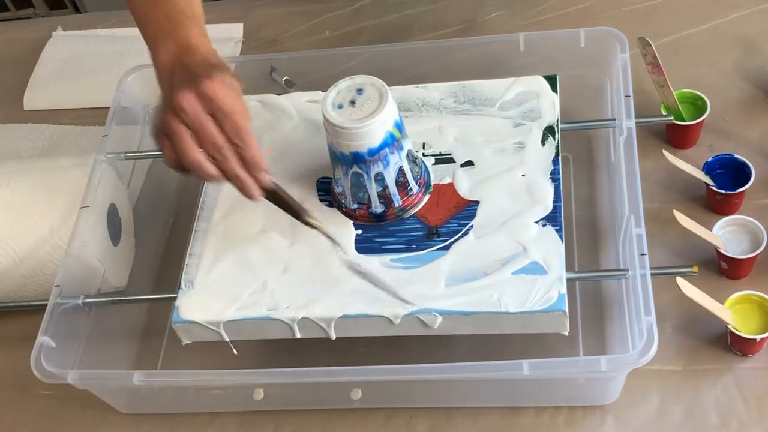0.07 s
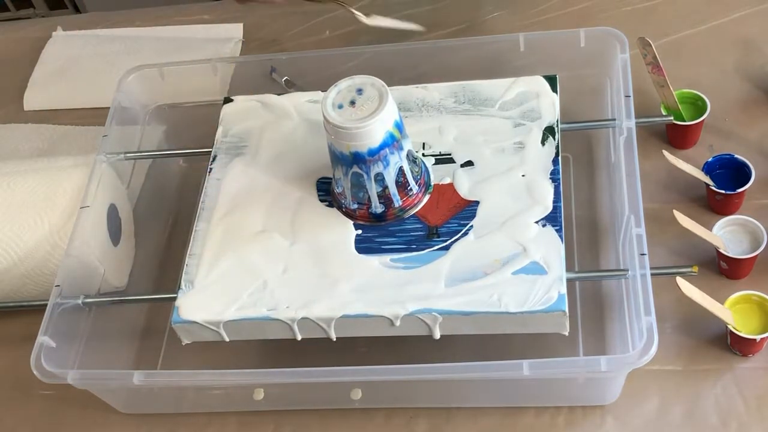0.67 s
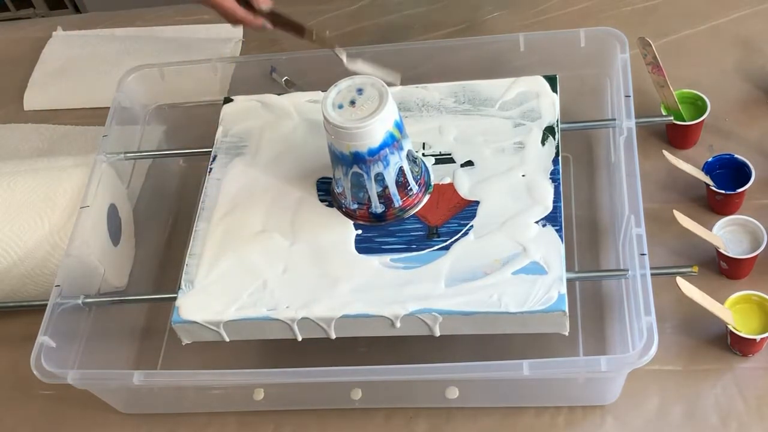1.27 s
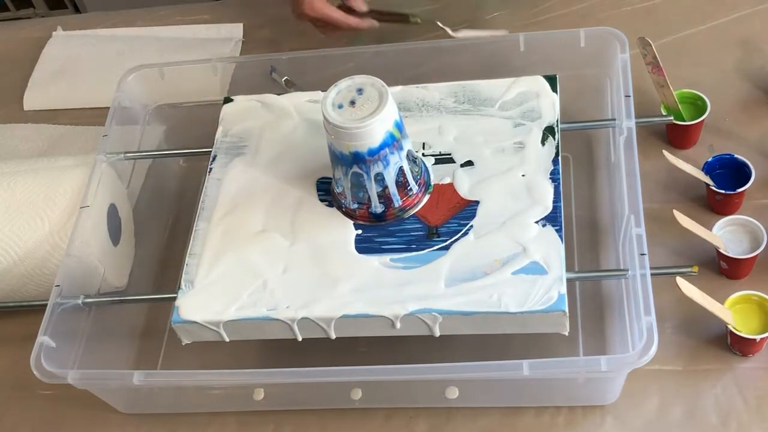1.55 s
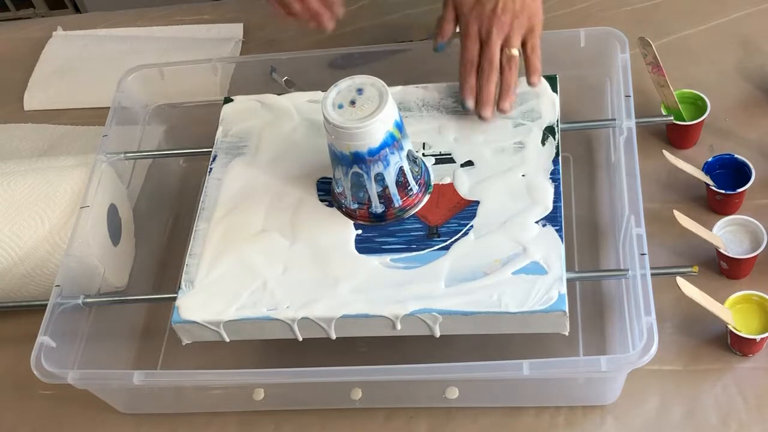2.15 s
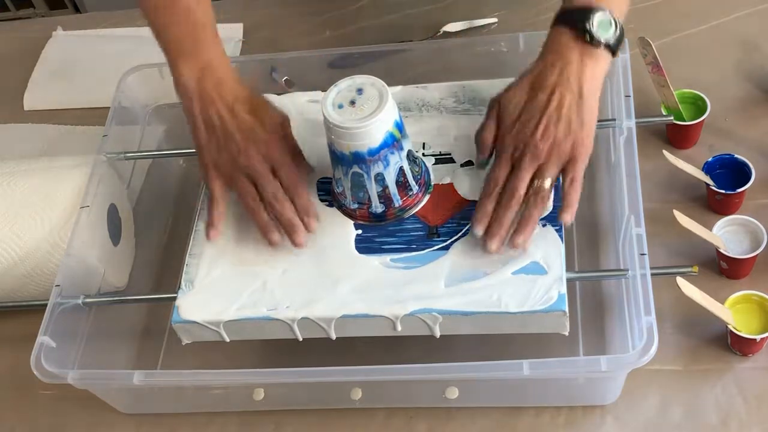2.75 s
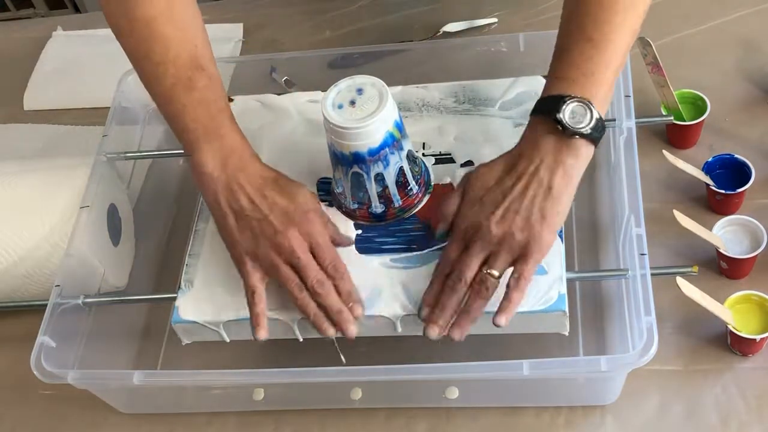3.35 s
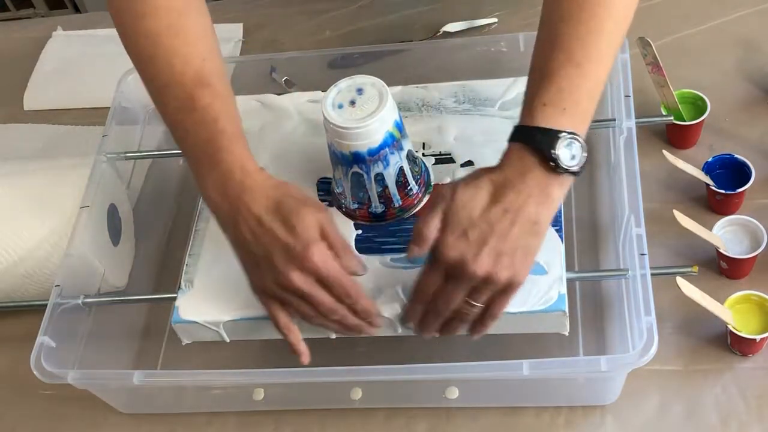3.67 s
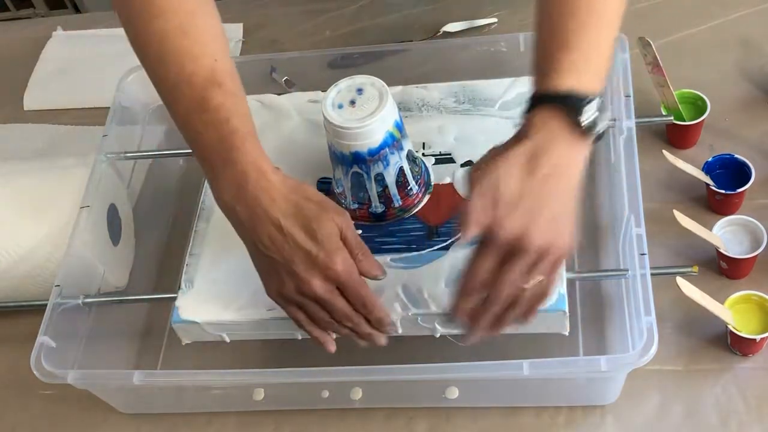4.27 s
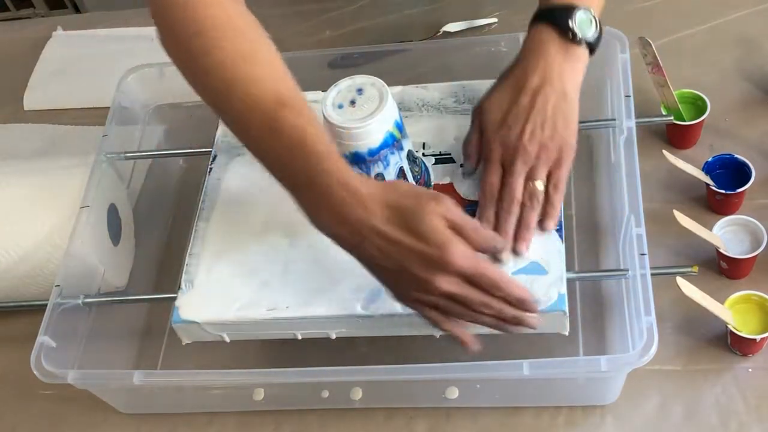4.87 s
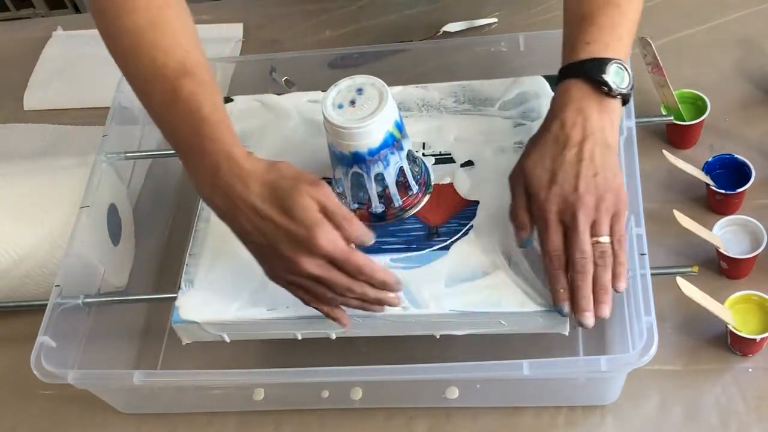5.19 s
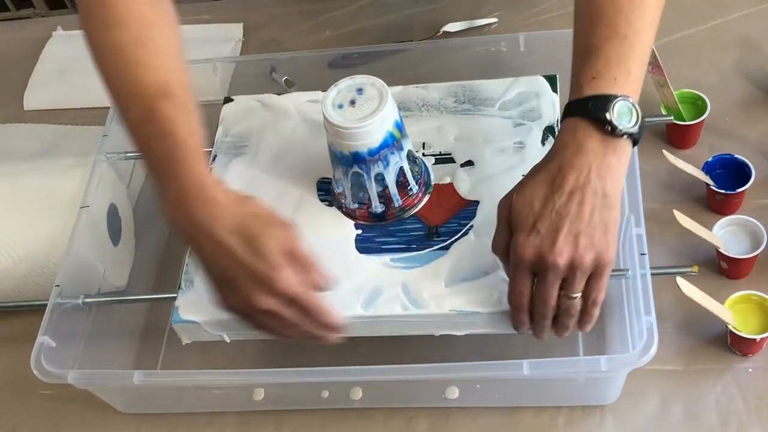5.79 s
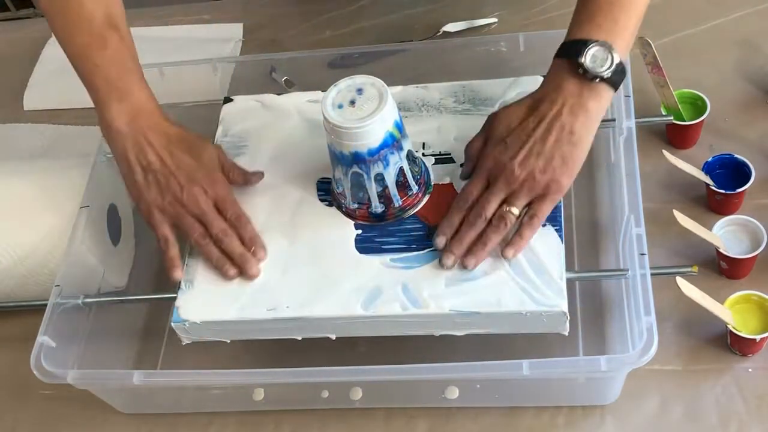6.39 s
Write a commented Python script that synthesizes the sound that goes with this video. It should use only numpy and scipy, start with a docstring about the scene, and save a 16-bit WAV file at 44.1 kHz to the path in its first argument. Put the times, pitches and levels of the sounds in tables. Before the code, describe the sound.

A close microphone in a small room hears a low ventilation rumble and a faint hum throughout. Soft, dull shuffles and a faint swish of clothing fill the first half second. A metal palette knife taps a painted canvas lightly at about 1 second and wipes it briefly at 1.3. Near 1.7 seconds it ticks and gives a tiny squeak. At about 1.9 it is set down on the table with three quick knocks, the first hard and bright with a short metallic ring, the others duller; this is by far the loudest sound. Clothes swish faintly around 2.5 seconds. From about 3.4 seconds two hands smear the paint in soft, hissing strokes, firmest between 3.8 and 4.2, continuing to 4.7. After a lull, lighter strokes return from 5.4 to about 6 seconds, with faint hollow rubbing from the canvas frame until about 6.5.

```python
"""Palette knife and hands on a canvas

A metal palette knife taps and wipes a painted canvas, squeaks, and is put down with three blows that
ring its blade, its handle and the table. Two hands then smear the paint: countless tiny slips hiss and
stir the stretched canvas, which lies on rods across a plastic bin. Clothes swish faintly.
One close microphone hears it all in a small room with a low ventilation rumble and a faint hum."""
import sys
import numpy as np
from scipy import signal
from scipy.fft import rfft, irfft
from scipy.io import wavfile
from scipy.ndimage import map_coordinates

SR = 44100
rng = np.random.default_rng(int(sys.argv[2]) if len(sys.argv) > 2 else 0)


def int16_out(signal):
    """Quantize to a 16-bit WAV file."""
    q = np.round(np.clip(np.atleast_2d(signal).T, -1, 1) * 32767)
    wavfile.write(sys.argv[1], SR, q.astype(np.int16))


N = 288120

# the knife lands: t/s, table level/dB, blade level/dB, handle level/dB, treble limit/Hz,
# delay of a second contact/s, its level/dB
BLOWS = [(1.8728, -1, -2, -35.5, 13100, 0.0038, 0.5), (1.9707, -8, -14, -34, 3320, .004, 2.5),
         (2.0191, -11, -15.5, -29.5, 2290, 0.00294, -10)]
# modes, the tones a struck thing rings with: f/Hz, level/dB, t60/s (the time to die away by 60 dB)
TABLE_MODES = [(155.6, -42, 0.25), (208, -33, 0.12), (236.7, -33, 0.23), (266, -41.5, 0.26),
               (304, -38.5, .18), (370, -37, 0.19), (429.5, -29.5, 0.27), (522, -39.5, .19),
               (538, -40.5, 0.26), (625.5, -34.5, 0.34), (676, -41, 0.17), (756, -40, 0.22),
               (838, -37, .18), (890, -43.5, .16), (1024, -49, .13), (1104, -43, .17), (1268, -43, .18),
               (1280, -35, 0.28), (1416, -33.5, 0.15)]
BLADE_MODES = [(1490, -32, 0.192), (1506, -33, .19), (1540, -31.5, 0.14), (1630, -33.5, 0.14),
               (1686, -35.5, 0.17), (1720, -34.5, 0.17), (2020, -33.5, 0.15), (2080, -33.5, 0.21),
               (2220, -40, 0.19), (2810, -38.5, .08), (3040, -53, .11), (3530, -42, .08), (4466, -45, .2),
               (5260, -47.5, 0.15), (5320, -50, 0.12), (7140, -41.5, 0.11), (7165, -43, .1),
               (9490, -44.5, 0.15), (11680, -48, 0.19), (12050, -48, .12)]
# the noisy ring of crowded modes between the clear ones: f/Hz, level/dB
BLADE_RING = [(130, -7), (240, 8.5), (420, -2), (800, -7.5), (1300, -1), (1600, 4), (2150, 2), (2450, -2.5),
              (2800, -4), (3500, -13.5), (4100, -10.5), (8000, -18.5), (11000, -26.5), (13500, -18.5),
              (15500, -21)]
HANDLE_RING = [(60, -24), (130, -11), (240, 2), (500, -2), (900, 4), (1600, 0.5), (2700, -3), (3400, -6),
               (4300, -15), (8000, -17.5), (15000, -24)]
# how long that ring lasts: f/Hz, t60/s
RING_T60 = [(100, 0.13), (400, 0.22), (1500, 0.18), (3000, 0.13), (6000, 0.145), (15000, 0.18)]
def clatter(rise_s=0.00044, blade_ring_db=-29, tick_db=-14, flat_at_s=1.965, settle_s=0.023):
    """The blade hits the table first, hard and bright; the duller handle follows and bounces once."""
    knocks, metal = np.zeros(N), np.zeros(N)
    rise = 1 - np.exp(-np.arange(SR) / SR / rise_s)
    crack = 1 + from_db(1) * decay(t60=0.02)   # the first milliseconds stand out
    for s, table_db, blade_db, handle_db, bright_hz, again_s, again_db in BLOWS:
        add(knocks, s, from_db(table_db) * rise * struck(TABLE_MODES, spread_db=1.5))
        blade_tones = contact(struck(BLADE_MODES, spread_db=2.0), bright_hz)
        add(metal, s, from_db(blade_db) * rise * blade_tones)
        tick_gain = from_db(tick_db) * min(bright_hz / 3000, 1.5) ** 3.3   # even a soft contact ticks
        for at, force in ((s, 1), (s + again_s, from_db(again_db))):   # it never lands quite level
            blade = from_db(blade_db + blade_ring_db) * dying_noise(BLADE_RING, RING_T60)
            handle = from_db(handle_db) * dying_noise(HANDLE_RING, RING_T60)
            ring = force * rise * crack * (blade + handle)
            add(knocks, at, contact(ring, bright_hz) + tick_gain * band(ring, 4430, 20000))
    low, high = (pass_filter(metal, kind, hz=3500, order=2) for kind in ("low", "high"))
    # lying flat muffles the blade's high tones
    high_db = np.interp(np.arange(N) / SR, [flat_at_s, flat_at_s + settle_s], [2.5, -19.5])
    return knocks + low - from_db(high_db) * high


def struck(modes, spread_db):
    """A blow rings every mode with a strength of its own; neighbours start in opposite directions."""
    t = np.arange(SR) / SR
    chance_db = rng.normal(0, 1, len(modes)) * spread_db
    return sum((-1) ** k * from_db(db + chance_db[k]) * decay(t60) * np.sin(2 * np.pi * hz * t)
               for k, (hz, db, t60) in enumerate(modes))


def contact(x, bright_hz):
    """The softer the contact, the less treble it makes."""
    return pass_filter(x, "low", bright_hz, order=4)


# light touches of the knife: t/s, level/dB, lowest f/Hz, highest f/Hz, t60/s
TOUCHES = [(0.1114, -66.5, 2500, 9600, 0.047), (1.0356, -50, 450, 2720, 0.12),
           (1.3393, -62.5, 1790, 5000, 0.11), (1.7276, -51.5, 2000, 7000, 0.15),
           (1.765, -71, 5000, 16430, 0.052)]
# tones of the tapped canvas and its frame: f/Hz, level/dB, t60/s
CANVAS_MODES = [(293.5, -57, 0.48), (503, -50.5, 0.17), (741, -50, 0.12), (1060, -54, .15), (2380, -57, .1)]
def touches(tick_db=6, tick_t60=0.011, canvas_tap_s=1.0355, canvas_db=-3):
    """A light touch is a sharp tick and a short noisy ring; the firmest also sounds the canvas."""
    out = np.zeros(N)
    for s, db, low_hz, high_hz, t60 in TOUCHES:
        ring = rms_one(band(rng.standard_normal(SR), low_hz, high_hz)) * decay(t60)
        tick = rms_one(band(rng.standard_normal(SR), low_hz, high_hz, order=1)) * decay(tick_t60)
        add(out, s, from_db(db) * (ring + from_db(tick_db) * tick))
    add(out, canvas_tap_s, from_db(canvas_db) * struck(CANVAS_MODES, spread_db=1.5))
    return out


# the blade sings as its tip slides: loudest t/s, swell/s, fade/s, level/dB
SQUEAKS = [(1.724, 0.017, 0.025, -59.5), (1.76, .015, 0.023, -62.5)]
def squeak(pitch_hz=1630, waver=0.0084, octave_db=-11):
    """The tip sticks and slips, driving one tone of the blade and a weak octave above it."""
    phase = 2 * np.pi * np.cumsum(pitch_hz * (1 + waver * drift(120))) / SR
    tone = np.sin(phase) + from_db(octave_db) * np.sin(2 * phase)
    return swells(SQUEAKS)[0] * np.sqrt(2) * tone


# one wipe of the blade, then the hands: firmest t/s, swell/s, fade/s, hiss level/dB, canvas level/dB
STROKES = [(1.308, 0.091, 0.066, -61.5, -64), (3.36, 0.094, 0.1, -78.5, -69.5),
           (3.645, .03, 0.066, -68, -77), (3.775, 0.084, 0.16, -56, -65.5), (3.85, 0.069, 0.09, -52, -67),
           (3.918, 0.13, .1, -49.5, -55.5), (4.065, 0.035, 0.074, -55, -60),
           (4.115, 0.083, 0.12, -53.5, -57.5), (4.2, .06, 0.095, -61, -66.5),
           (4.395, 0.017, 0.027, -70, -77), (4.495, 0.072, 0.16, -57.5, -67),
           (4.585, 0.032, 0.094, -59.5, -68), (4.712, 0.067, 0.11, -59, -61.5),
           (4.95, 0.065, 0.076, -84, -72.5), (5.14, 0.065, 0.11, -84, -69.5), (5.43, 0.063, 0.09, -70, -69),
           (5.515, 0.081, 0.13, -64.5, -62), (5.795, 0.16, 0.18, -62.5, -64.5),
           (5.85, .02, .05, -61, -65.5), (5.997, 0.094, 0.11, -64, -68.5)]
# tone colour of the rubbing hiss and of the canvas under it: f/Hz, level/dB
HISS_COLOUR = [(1500, -34), (3000, -9), (4500, -2), (5400, 1), (6100, 0), (7300, 0), (8600, 1.5),
               (10000, -0.5), (11500, -5), (15500, -4.5)]
CANVAS_COLOUR = [(300, -1), (600, -15), (1000, -0.5), (1600, 3.5), (2000, 5.5), (2250, -1.5), (3200, 1.5),
                 (4500, 1), (9000, -14)]
# lower edges of the hiss bands that waver separately: f/Hz
HISS_BANDS = [0, 3500, 4800, 6200, 8000, 10500]
# where the canvas, its frame and the rods ring: f/Hz, width/Hz, level/dB
CANVAS_PEAKS = [(715, 50, -8), (934, 60, -6), (1514, 50, -3.5), (1730, 17, -7), (2405, 41, 15),
                (2583, 39, 8.5), (2680, 47, 3.5), (2960, 74, 5), (3466, 30, 4), (5430, 77, 4)]
def rubbing(grain_db=3, unevenness_db=1.45, patchy_db=1.5, firm_db=-52):
    """Countless tiny slips over the weave hiss directly and stir the canvas on its frame."""
    hiss_gain, body_gain = swells(STROKES)
    force = hiss_gain / from_db(firm_db)
    tiny_slips = rng.standard_normal((2, N)) * from_db(grain_db * rng.standard_normal((2, N)))
    body_slips, hiss_slips = tiny_slips + snags()
    pressure = from_db(unevenness_db * drift(70))
    # the colour shifts as different parts of the hand touch
    spectrum = rfft(under_palm(colour(hiss_slips, HISS_COLOUR)))
    band_index = np.digitize(np.arange(N // 2 + 1) * SR / N, HISS_BANDS)
    *lower, top = [irfft(spectrum * (band_index == k), N) * from_db(patchy_db * drift(12))
                   for k in np.unique(band_index)]
    hiss = hiss_gain * (sum(lower) + top * force ** 0.098)   # lighter strokes are duller
    body = colour(body_slips, CANVAS_COLOUR)
    drive = pressure * body_gain * body / np.std(body + resonate(body, CANVAS_PEAKS))
    ringing = resonate(drive * (.5 + force) ** 0.4, CANVAS_PEAKS)   # firm strokes ring the most
    return pressure * hiss + drive + ringing


def snags(per_second=500, smallest_db=4):
    """Ridges of paint cause scattered larger slips of uneven size."""
    caught = rng.random(N) < per_second / SR
    return caught * from_db(smallest_db + 2 * np.minimum(rng.exponential(1, N), 3))


def under_palm(x, delay_s=0.000704, sway=0.26, echo_db=-11.5):
    """An echo off the palm weakens some pitches of the hiss; they wander as the gap changes."""
    lag = delay_s * SR * np.exp(sway * drift(9))
    echo = map_coordinates(x, [np.arange(N) - lag], order=3)
    return rms_one(x + from_db(echo_db) * echo)


# a hand presses on the frame's edge: firmest t/s, swell/s, fade/s, level/dB
FRAME_PUSHES = [(4.5, 0.13, 0.27, -71.5), (5.48, 0.16, .15, -75), (5.84, 0.22, 0.43, -69),
                (6.44, 0.048, 0.27, -69.5)]
# where the frame rings: f/Hz, width/Hz, level/dB
FRAME_PEAKS = [(474, 23, -4), (722, 64, 3), (928, 89, -1), (1032, 58, -2), (1295, 80, -1.5),
               (2100, 150, -3.5), (2400, 90, -15)]
def frame(unevenness_db=3):
    """Uneven rubbing rings the hollow frame."""
    friction = rng.standard_normal(N) * from_db(unevenness_db * drift(40))
    ring = resonate(band(friction, 410, 2800), FRAME_PEAKS)
    return swells(FRAME_PUSHES)[0] * rms_one(ring)


# soft shuffles: loudest t/s, swell/s, fade/s, level/dB
SHUFFLES = [(0, .02, .11, -62), (.17, 0.047, 0.05, -69), (.3, 0.039, 0.093, -58), (.345, .04, 0.15, -61.5),
            (1.12, .05, 0.083, -63.5), (1.61, 0.066, .12, -69.5)]
# their tone colour: f/Hz, level/dB
SHUFFLE_COLOUR = [(110, 1), (210, 14), (400, 3.5), (650, 1.5), (850, -8.5), (1150, -0.5), (1600, -3),
                  (2400, -8.5), (2900, -7), (3600, -18), (4500, -14.5), (9000, -27)]
def shuffling(unevenness_db=3):
    """Things shifting at the table make a dull, uneven rustle."""
    rustle = colour(rng.standard_normal(N), SHUFFLE_COLOUR)
    return swells(SHUFFLES)[0] * rustle * from_db(unevenness_db * drift(60.1))


# the arms draw back, then reach out: loudest t/s, swell/s, fade/s, level/dB
SWISHES = [(.5, 0.28, 0.37, -68), (2.5, 0.79, 0.29, -73)]
# tone colour of the cloth: f/Hz, level/dB
SWISH_COLOUR = [(500, -5), (1100, -5.5), (2000, -2), (2800, -4.5), (3400, -6), (8000, -12), (15000, -18.5)]
def clothing(unevenness_db=0.2):
    """Cloth makes a smooth, faint swish as the arms move."""
    swish = colour(rng.standard_normal(N), SWISH_COLOUR)
    return swells(SWISHES)[0] * swish * from_db(unevenness_db * drift(40))


# how long the room echoes: f/Hz, t60/s
ROOM_T60 = [(100, 0.56), (500, 0.4), (2000, 0.46), (5000, 0.51), (15000, 0.56)]
def room(x, echo_db, build_s):
    """A blur of echoes, weaker in the treble, builds up and dies away."""
    tail = dying_noise([(200, 0), (2500, 0), (12000, -7)], ROOM_T60)
    tail *= 1 - np.exp(-np.arange(SR) / SR / build_s)
    return x + from_db(echo_db) * signal.fftconvolve(x, tail / np.linalg.norm(tail))[:N]


# tone colour of the moving air: f/Hz, level/dB
AIR_COLOUR = [(35, -34), (60, -5.5), (76, -12.5), (102, -4), (145, -3.5), (210, -2.5), (266, -6.5),
              (443, -14), (657, -19), (756, -20.5), (1120, -23.5), (1700, -28), (1910, -28), (3580, -31.5),
              (15500, -39)]
# tones of the hum: f/Hz, level/dB
HUM_TONES = [(48.4, -70), (101, -77), (122, -76), (204.6, -71), (236, -78)]
def ventilation_and_hum(air_db=-63, wander_rad=0.34):
    """Ventilation rumbles under a thin hiss, beside a hum whose pitch wanders slightly."""
    t = np.arange(N) / SR
    hum = sum(np.sqrt(2) * from_db(db) * np.sin(2 * np.pi * hz * t + wander_rad * drift(2.9))
              for hz, db in HUM_TONES)
    return from_db(air_db) * colour(rng.standard_normal(N), AIR_COLOUR) + hum


def swells(rows, drop_db=24, roundness=1.87):
    """Each slide swells to a rounded peak and fades; gives one gain curve for each level column."""
    t = np.arange(N) / SR
    power = np.zeros((len(rows[0][3:]), N))
    for s, swell_s, fade_s, *levels_db in rows:
        away = np.maximum((s - t) / swell_s, (t - s) / fade_s)   # 0 at the peak, 1 when drop_db down
        near = away < 3
        shape = from_db(-drop_db * away[near] ** roundness)
        power[:, near] += np.outer(from_db(levels_db), shape) ** 2
    return np.sqrt(power)


def dying_noise(spectrum, t60s):
    """Modes too crowded to tell apart: half-octave bands of noise, each dying at its own pace."""
    edges_hz = 45 * 2 ** np.arange(0, 8.6, .5)
    steady, dying = 0, 0
    for low, high in zip(edges_hz, edges_hz[1:]):
        hz = np.sqrt(low * high)
        noise = band(rng.standard_normal(2 * SR), low, high)[SR:] * from_db(at_hz(spectrum, hz))
        steady += noise
        dying += noise * decay(at_hz(t60s, hz))
    return dying / np.std(steady)


def resonate(x, peaks):
    """A body picks out the pitches near its peaks and rings with them."""
    return sum(from_db(db) * signal.lfilter(*signal.iirpeak(hz, hz / width, fs=SR), x)
               for hz, width, db in peaks)


def colour(x, spectrum):
    """Give noise a tone colour that falls away below the table's first point; average level 1."""
    hz = np.arange(N // 2 + 1) * SR / N
    bass_cut = np.minimum(hz / spectrum[0][0], 1) ** 2
    return rms_one(irfft(rfft(x) * from_db(at_hz(spectrum, hz)) * bass_cut, N))


def pass_filter(x, kind, hz, order):
    """Keep the "low", "high" or "band" part of a sound; a higher order cuts more steeply."""
    return signal.sosfilt(signal.butter(order, hz, kind, fs=SR, output="sos"), x)


def band(x, low_hz, high_hz, order=2):
    """Keep what lies between two frequencies."""
    return pass_filter(x, "band", [low_hz, high_hz], order)


def drift(turns_per_s):
    """A random curve that wanders around zero, by about 1."""
    points = rng.standard_normal(2048)
    return np.interp(np.arange(N) / SR * turns_per_s, np.arange(len(points)), points)


def decay(t60):
    """A one-second fade that loses 60 dB every t60 seconds."""
    return from_db(-60 * np.arange(SR) / SR / t60)


def add(out, s, sound):
    """Mix a sound in, starting at s seconds."""
    start = round(s * SR)
    out[start:start + len(sound)] += sound[:N - start]


def at_hz(points, hz):
    """Read between a table's rows, with octaves evenly spaced."""
    freqs, values = np.transpose(points)
    return np.interp(np.log(np.maximum(hz, 1)), np.log(freqs), values)


def from_db(db):
    """Turn decibels into a gain."""
    return 10 ** (np.asarray(db) / 20)


def rms_one(x):
    """Scale to an average level (rms) of 1."""
    return x / np.sqrt(np.mean(x ** 2) + 1e-20)


def scene():
    """Knife and hands sound in the room over its steady noise."""
    knife = room(clatter() + touches() + squeak(), echo_db=-14.5, build_s=0.0082)
    hands = room(rubbing() + frame() + shuffling() + clothing(), echo_db=-15.5, build_s=0.002)
    return (knife + hands + ventilation_and_hum())[None]


def record(dry, lowest_hz=38, highest_hz=15850):
    """The deepest bass and the highest treble are cut steeply."""
    x = pass_filter(dry, "high", lowest_hz, order=6)
    return signal.sosfilt(signal.ellip(12, .1, 70, highest_hz, fs=SR, output="sos"), x)


dry = scene()
out = record(dry)
int16_out(out)
```